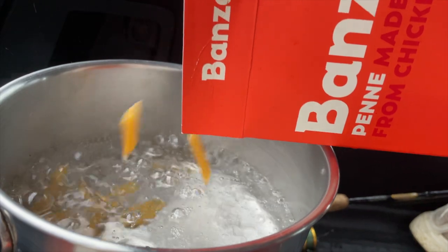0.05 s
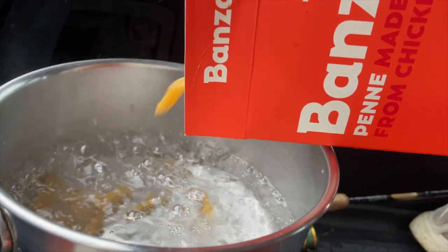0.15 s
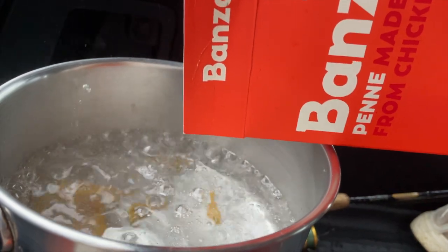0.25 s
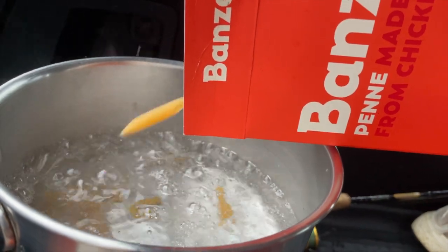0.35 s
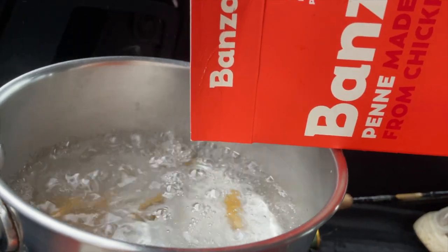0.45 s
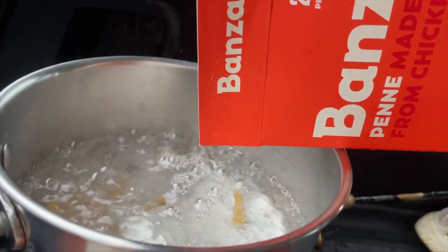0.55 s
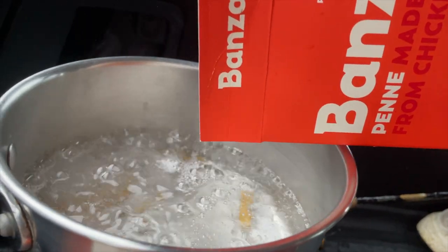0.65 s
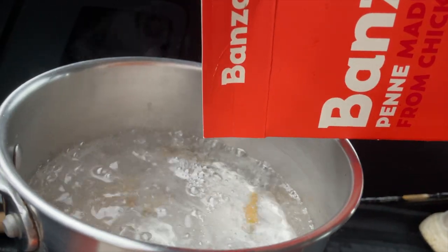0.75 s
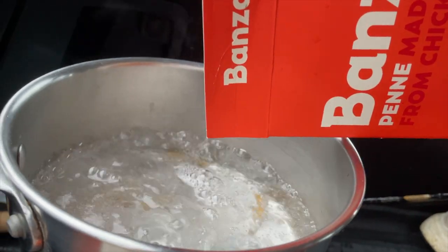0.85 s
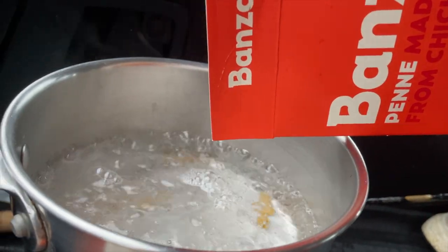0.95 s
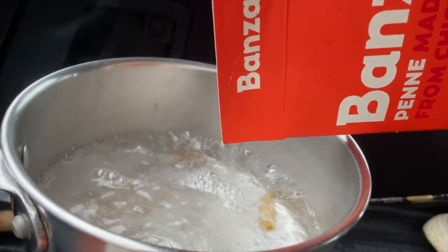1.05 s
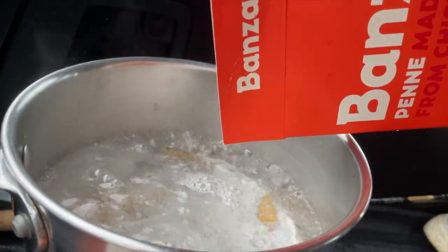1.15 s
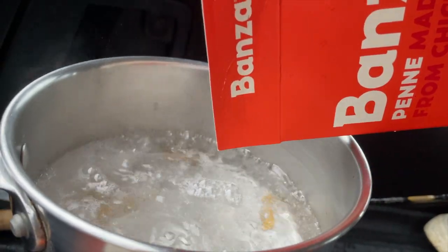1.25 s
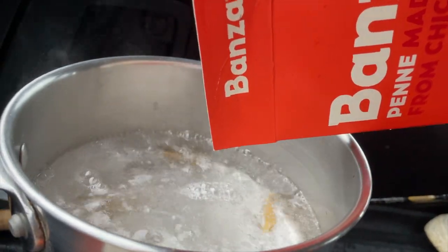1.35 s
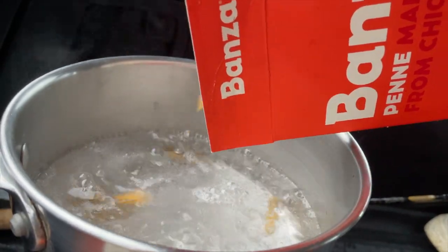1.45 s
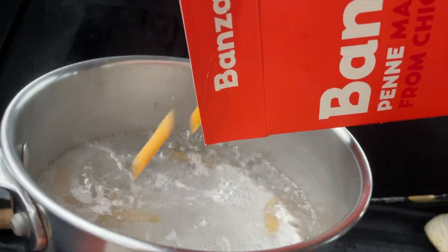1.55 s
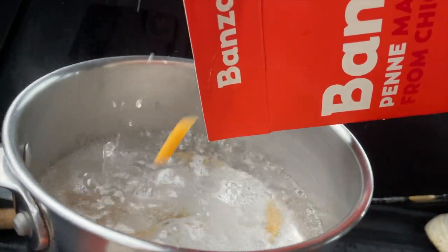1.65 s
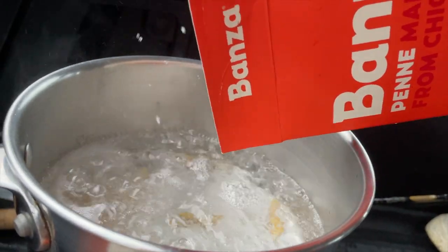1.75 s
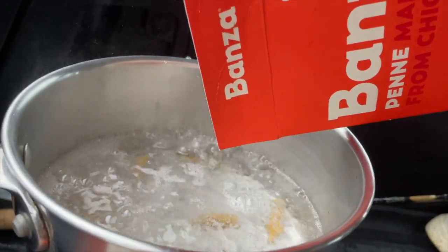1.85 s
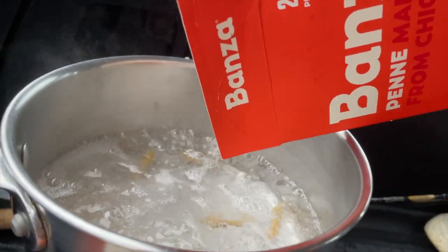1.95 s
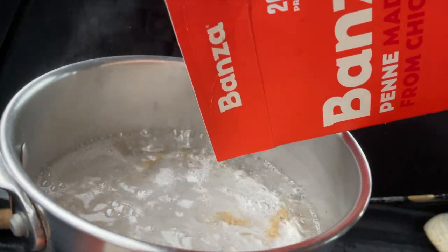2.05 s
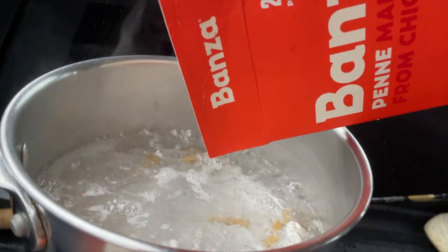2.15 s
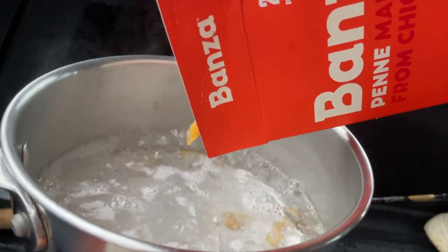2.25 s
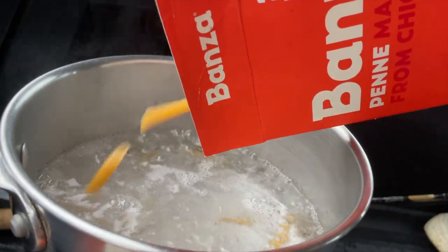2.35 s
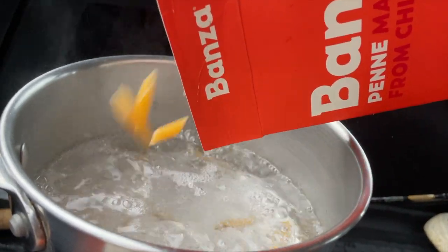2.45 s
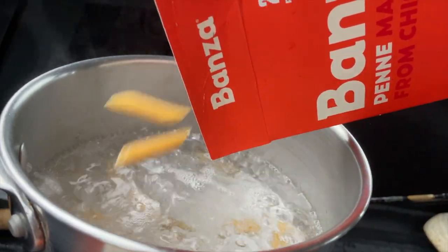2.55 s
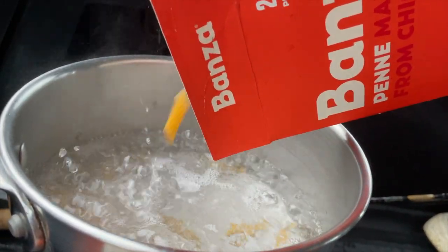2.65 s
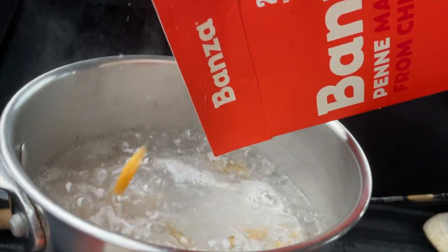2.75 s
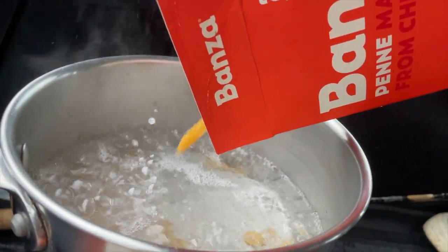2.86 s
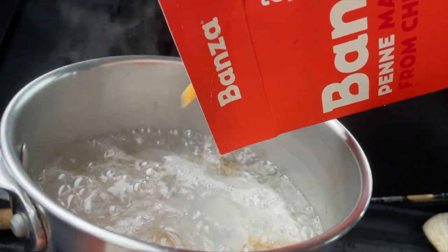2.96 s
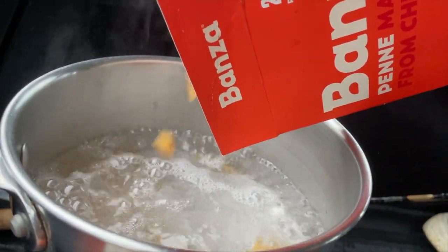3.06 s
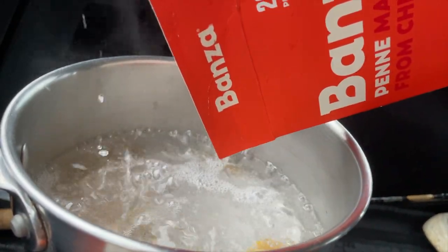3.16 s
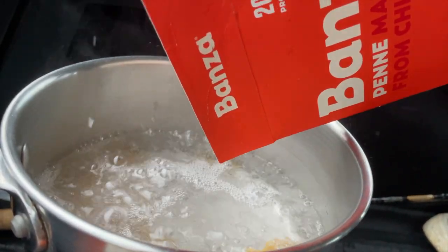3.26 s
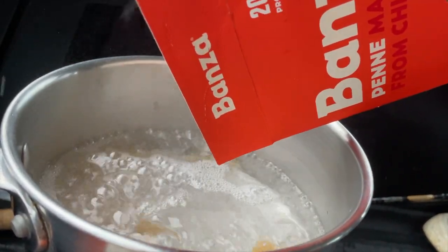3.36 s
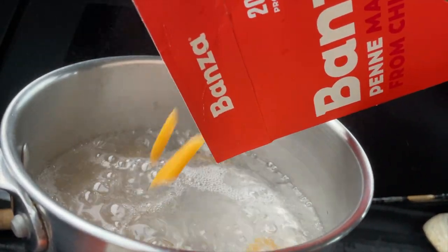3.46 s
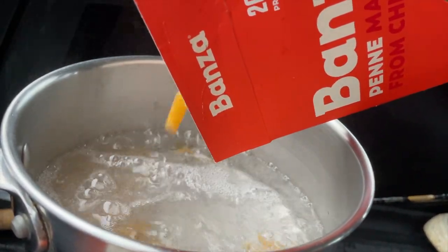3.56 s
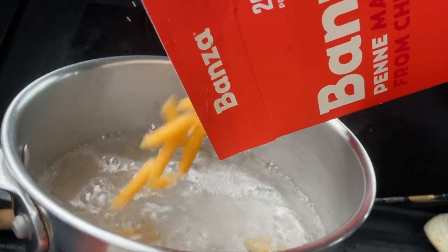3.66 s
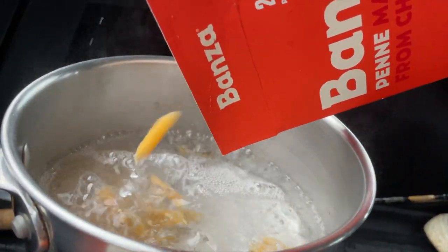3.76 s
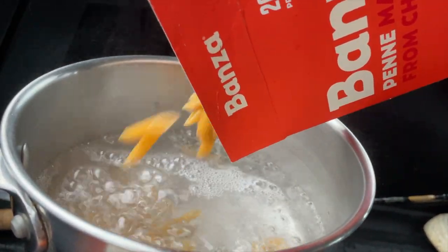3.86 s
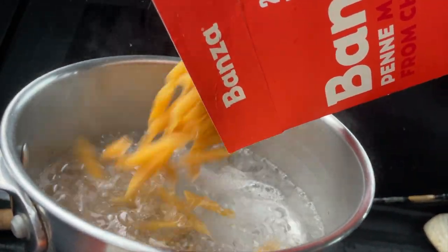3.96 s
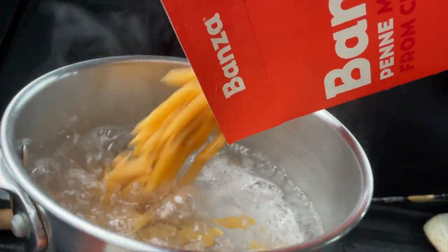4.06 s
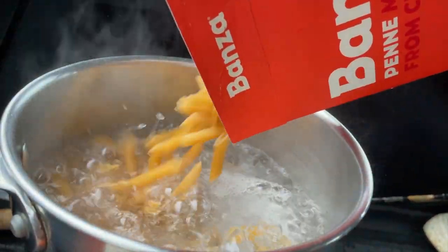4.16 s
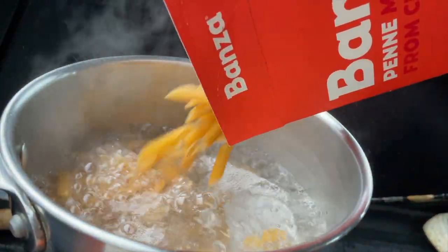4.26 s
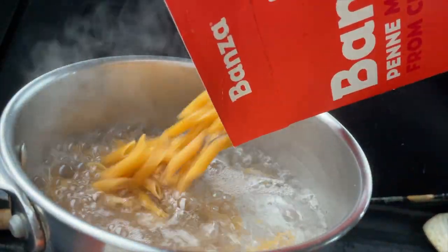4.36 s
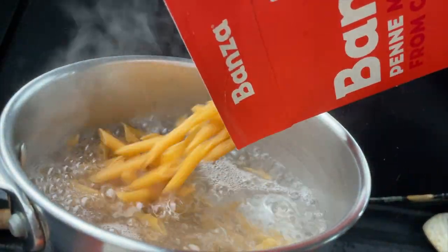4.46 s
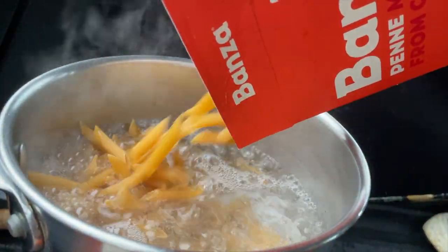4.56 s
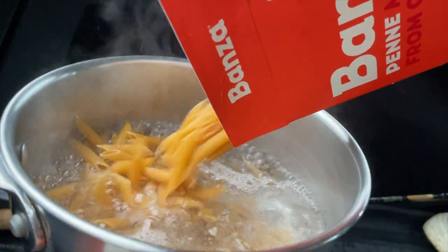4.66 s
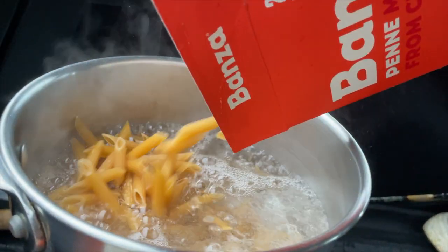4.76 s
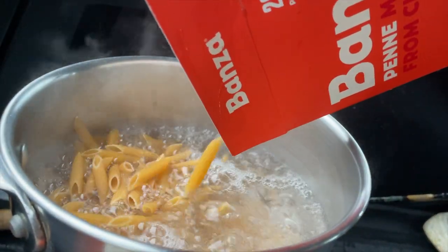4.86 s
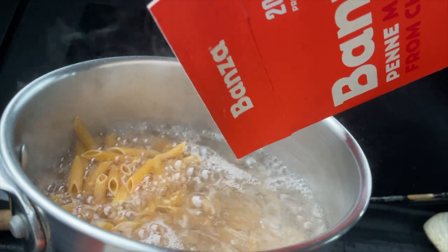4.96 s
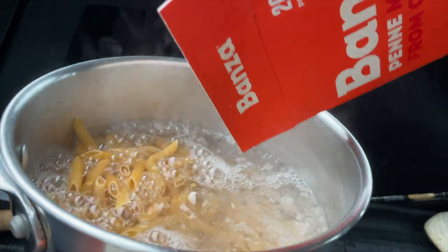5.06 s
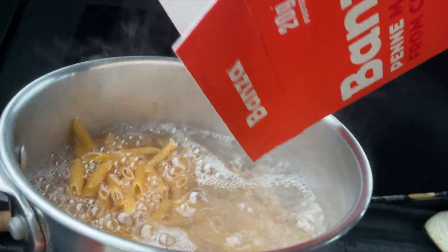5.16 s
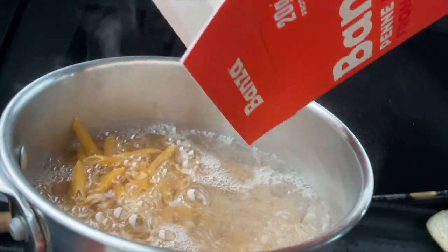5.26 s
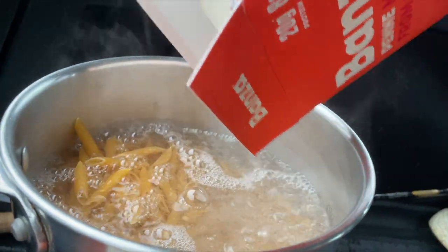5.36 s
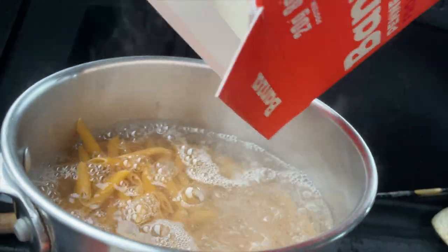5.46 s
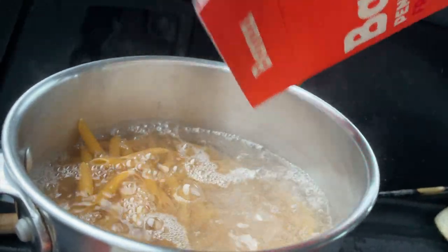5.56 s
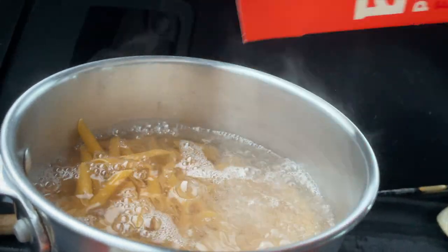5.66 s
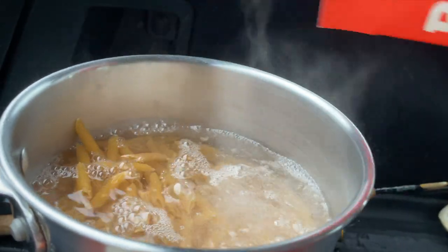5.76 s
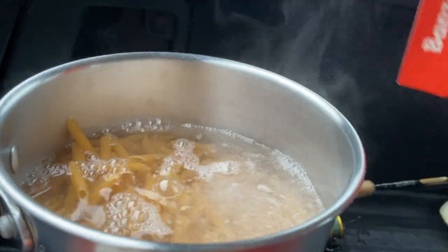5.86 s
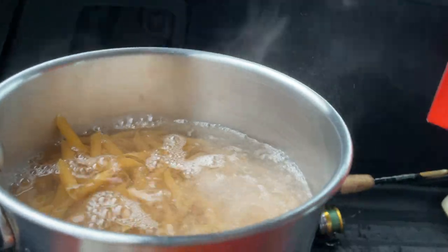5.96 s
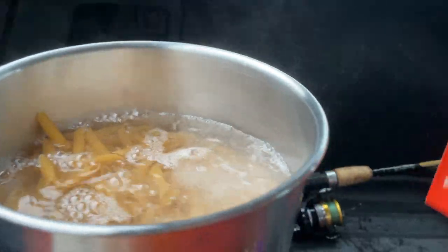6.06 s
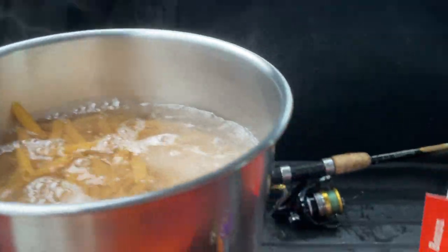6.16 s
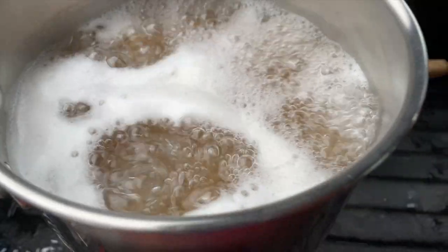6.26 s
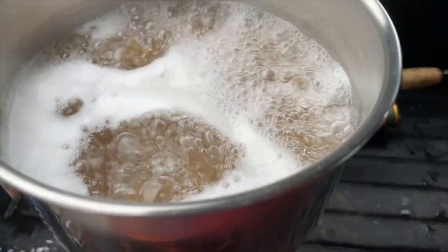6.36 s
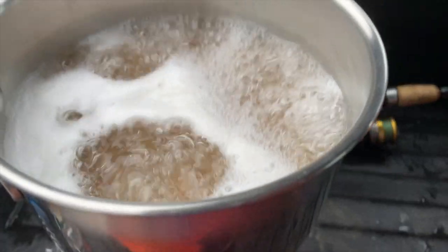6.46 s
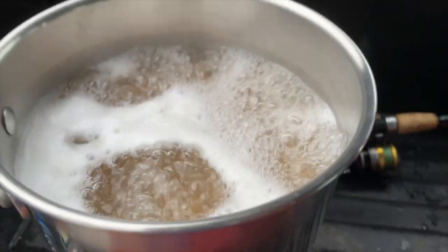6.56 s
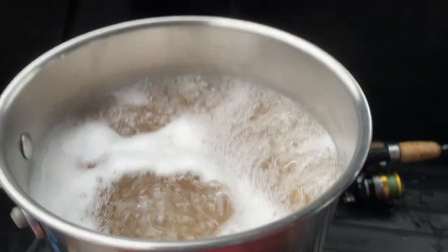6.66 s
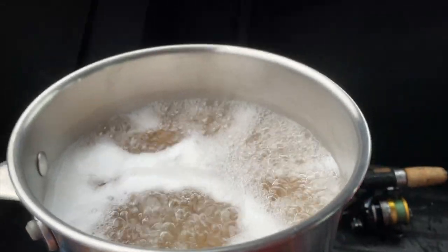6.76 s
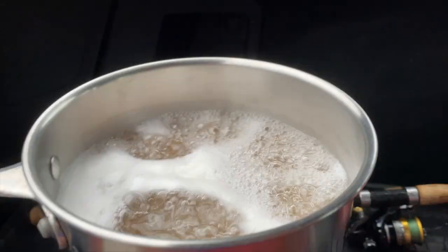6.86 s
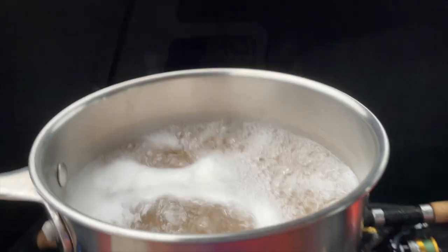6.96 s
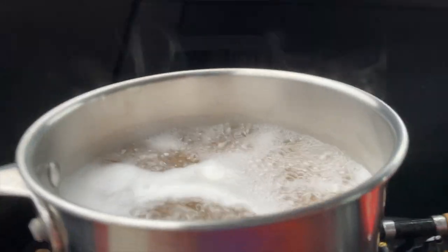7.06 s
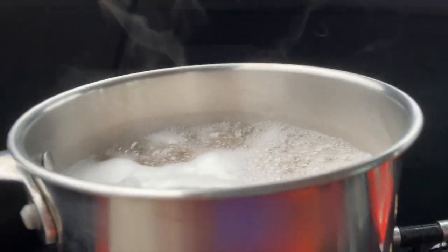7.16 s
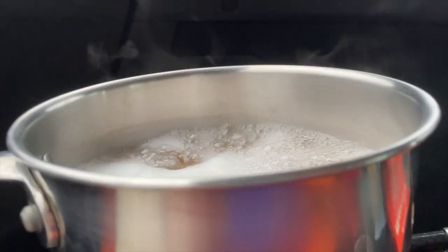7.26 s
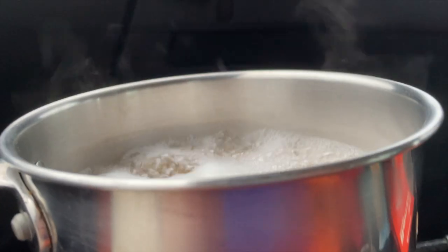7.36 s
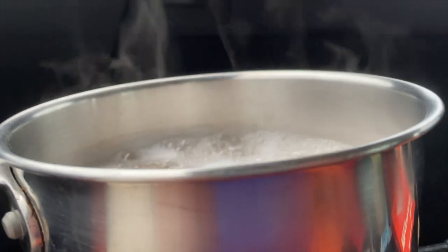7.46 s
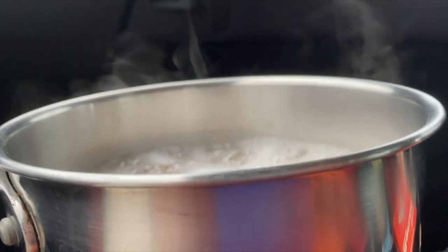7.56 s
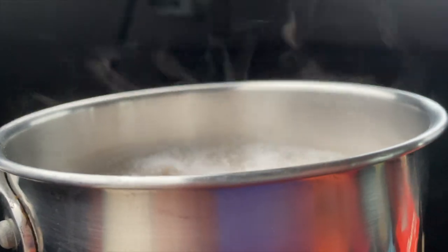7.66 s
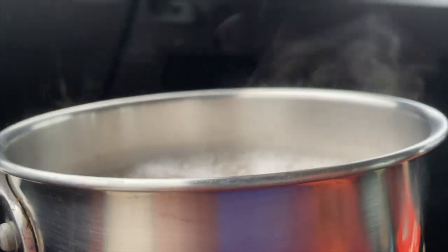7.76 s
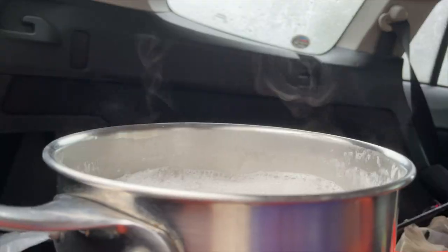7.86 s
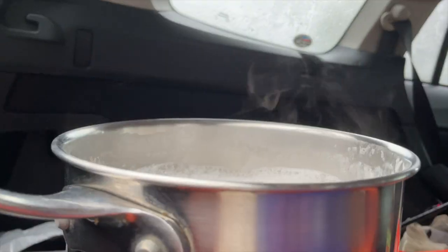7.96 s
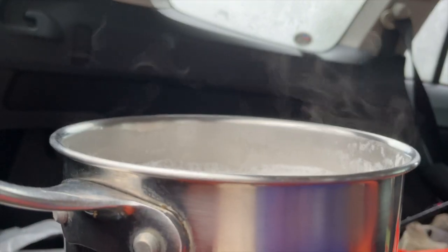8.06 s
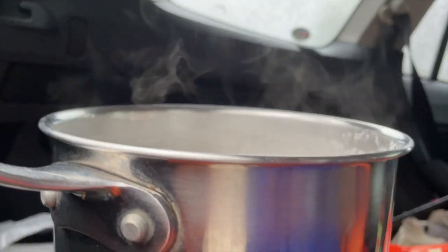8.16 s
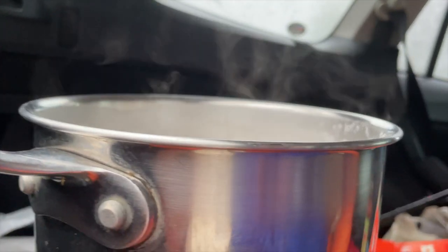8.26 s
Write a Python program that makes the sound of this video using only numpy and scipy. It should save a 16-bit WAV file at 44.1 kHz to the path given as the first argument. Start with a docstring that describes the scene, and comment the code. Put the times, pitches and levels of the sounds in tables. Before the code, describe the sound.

Hollow cardboard knocks and dry rasping come in uneven bursts over steady burner rumble, gas hiss and boiling bubbles. After about four seconds hard pasta tubes rush out, clicking and rattling as the water fizzes up. The pour stops quickly, leaving a calmer boil, then the box lands with a thump. An abrupt change brings the flame nearer, bubbling louder with a thin high whistle, before the gas drops. Close microphone, small dry cabin.

```python
"""In a small vehicle cabin a steel pot boils on a gas burner: filtered-noise rumble and hiss, ringing bubbles.
Dry penne shift in a cardboard box: grains rub and tick, single pieces knock panel modes, a few make the water fizz.
Then the load pours out; dense contacts ring many short tubes, and the fizz swells with the clatter.
Low booms follow, and the box lands with a thump: three quick blows on the modes of a surface.
The stove is then heard from nearer the flame, with a low drone and a stronger whistle, and at last with less gas."""
import sys
import numpy as np
from scipy import signal
from scipy.fft import rfft, irfft, next_fast_len
from scipy.io import wavfile
from scipy.ndimage import uniform_filter1d

SR = 44100
rng = np.random.default_rng(int(sys.argv[2]) if len(sys.argv) > 2 else 0)


def generate_wav(sig):
    """Save sig (samples, or channels by samples) to the path in sys.argv[1] as 16-bit PCM at SR."""
    pcm = np.round(np.clip(np.atleast_2d(sig).T, -1, 1) * 32767).astype(np.int16)
    wavfile.write(sys.argv[1], SR, pcm)


N = 366471
TIME = np.arange(N) / SR
CUTOFF_HZ = 15900


def amp(db):
    """Decibels to linear gain."""
    return 10 ** (np.asarray(db) / 20)


def rms_one(x):
    """Scale to an RMS of 1."""
    return x / np.sqrt(np.mean(x ** 2) + 1e-20)


def peak_one(x):
    """Scale to a peak of 1."""
    return x / (np.abs(x).max() + 1e-20)


def in_time(rows):
    """Each column of a breakpoint curve at every sample."""
    s, *columns = np.transpose(rows)
    return [np.interp(TIME, s, column) for column in columns]


def at_hz(points, hz):
    """A spectrum in dB, read on a log-frequency axis."""
    points = np.array(points)
    return np.interp(np.log(hz + 1), np.log(points[:, 0]), points[:, 1])


def add(track, s, sound):
    """Lay a short sound into a track, in place."""
    at = max(int(s * SR), 0)
    track[at:at + len(sound)] += sound[:N - at]


def drift(rate):
    """Smooth random movement of RMS 1, with the given number of random knots per second."""
    knots = rng.standard_normal(int(N / SR * rate) + 2)
    return rms_one(np.interp(TIME * rate, np.arange(len(knots)), knots))


def colour(x, spectrum, size=4096):
    """Causal (minimum-phase) filter with the given spectrum, built by folding its cepstrum."""
    cepstrum = irfft(np.log(amp(at_hz(spectrum, np.fft.rfftfreq(size, 1 / SR)))))
    cepstrum[1:size // 2] *= 2
    cepstrum[size // 2 + 1:] = 0
    impulse = irfft(np.exp(rfft(cepstrum)))
    return signal.oaconvolve(x, impulse)[:len(x)]


def ring(force, hz, t60):
    """One decaying mode: a unit click starts a cosine of height about 1."""
    radius = amp(-60 / (t60 * SR))
    angle = 2 * np.pi * hz / SR
    return signal.lfilter([.5, 0, -.5], [1, -2 * radius * np.cos(angle), radius * radius], force + 1e-18)


def grains(per_s, spread_db):
    """Random clicks of uneven size and sign; mean power 1 at any constant rate."""
    born = rng.random(N) < per_s / SR
    size_db = spread_db * np.minimum(rng.standard_exponential(N)[born], 4)
    sign = np.sign(rng.random(N)[born] - .5)
    out = np.zeros(N)
    out[born] = amp(size_db) * sign
    return rms_one(out / np.sqrt(per_s))


def burst(rise_s, decay_s, size=4096):
    """Noise that swells and dies, for the many tiny contacts of one touch; energy 1."""
    t = TIME[:size]
    envelope = np.minimum(t / rise_s, 1) * np.exp(-np.maximum(t - rise_s, 0) / decay_s)
    noise = rng.standard_normal(size) * envelope
    return noise / np.sqrt(np.sum(noise ** 2))


def scatter(x, decay_s):
    """Dense near reflections: smeared in time by random phases, nearly unchanged in colour."""
    paths = rfft(burst(.0003, decay_s))
    phases_only = irfft(paths / np.abs(paths))
    return signal.fftconvolve(x, phases_only[:len(paths)])[:N]


# the stove beside the pot, calmed by cold pasta, nearer the flame, then with less gas:
# start_s, flame_level_db, boil_level_db, hiss_level_db, whistle_level_db
STOVE = [(0, -39, -53.5, -46.5, -57.5), (4.9, -39, -55, -47.5, -60.5), (6.23, -35.5, -49.5, -50, -53),
         (7.87, -39.5, -49.5, -53, -68)]
STOVE_CHANGE_S = 0.018


def stove_levels():
    """Each setting of the stove holds until the next, with a short glide between."""
    rows = np.array(STOVE)
    setting = np.searchsorted(rows[1:, 0], TIME)
    return uniform_filter1d(rows[setting, 1:].T, int(STOVE_CHANGE_S * SR), axis=1)


# burner rumble heard beside the pot: frequency_hz, gain_db
RUMBLE = [(15, -34), (30, -27), (42, -4), (65, -1), (105, -3.5), (150, -2), (215, -4), (270, -15.5),
          (420, -27), (900, -38.5), (2000, -95)]
# burner rumble heard nearer the flame: frequency_hz, gain_db
RUMBLE_NEAR = [(15, -40), (30, -17), (50, 1), (90, 2.5), (125, -5), (165, -0.5), (220, -7), (290, -17),
               (420, -18), (900, -32), (2000, -101)]


def flame(near, drone_hz=88.35, drone_db=-4.0):
    """Turbulent combustion rumbles as shaped noise; close to the flame a low drone stands out of it."""
    white = rng.standard_normal(N)
    drone = amp(drone_db) * rms_one(ring(rng.standard_normal(N), drone_hz, 0.48))
    beside_pot = rms_one(colour(white, RUMBLE))
    near_flame = rms_one(rms_one(colour(white, RUMBLE_NEAR)) + drone)
    return (1 - near) * beside_pot + near * near_flame


# gas hiss heard beside the pot: frequency_hz, gain_db
HISS = [(400, 10.5), (1100, -3.5), (1400, 2.5), (2000, -1), (2600, 3), (3200, 6), (3700, -0.5), (4700, 0),
        (5500, -4.5), (6650, 7.5), (7600, -4.5), (9500, -6), (13000, 0), (16000, 2.5)]
# gas hiss heard nearer the flame: frequency_hz, gain_db
HISS_NEAR = [(400, -8), (1100, 5), (1500, -4), (2400, 3.5), (3650, 1.5), (4400, 1), (4750, -1), (5200, 0),
             (5600, -7), (6650, 7), (7650, -8.5), (8700, -4), (9700, -6.5), (16000, -7)]
# hiss of the jet turned down: frequency_hz, gain_db
HISS_LOW = [(400, -3), (1100, 12), (1500, 4.5), (2200, 7.5), (2850, 4), (3250, 11), (3750, -1), (4700, -3),
            (5200, 0.5), (5600, -6), (6000, 5), (6700, 4), (7600, -7), (8500, -6), (16000, -7)]
# nozzle whistle and the fainter tones below it, both levels applied near the flame:
# time_s, whistle_pitch_hz, whistle_swell_db, lower_pitch_hz, lower_level_db
WHISTLE = [(6.25, 6060, -4, 4360, -14), (6.52, 6240, 2.5, 4320, -6), (6.88, 6060, 0, 4500, -12),
           (7.02, 6070, -3, 4550, -11), (7.25, 6160, -0.5, 4450, -18), (7.7, 6090, 1, 4400, -22)]


def jet(near, hiss_db, whistle_db, whistle_width_hz=95, wander_hz=20, flutter_db=1.8):
    """Gas hisses through the nozzle with a breathy, wavering whistle; fainter tones join it near the flame."""
    whistle_hz, swell_db, lower_hz, lower_db = in_time(WHISTLE)
    white = rng.standard_normal(N)
    low = TIME > STOVE[-1][0]
    hiss = 0
    for share, spectrum in [(1 - near, HISS), (near - low, HISS_NEAR), (low, HISS_LOW)]:
        hiss = hiss + share * rms_one(colour(white, spectrum))
    lower = near * amp(lower_db)
    tones = [(whistle_hz, amp(near * swell_db)), (lower_hz, lower), (1.17 * lower_hz, 0.53 * lower)]
    breath_filter = signal.butter(2, whistle_width_hz, fs=SR, output="sos")
    whistle = 0
    for hz, strength in tones:
        # slow noise on both quadratures makes a narrow band of noise around the moving pitch
        waver = signal.sosfilt(breath_filter, rng.standard_normal((2, N)))
        phase = 2 * np.pi * np.cumsum(hz + wander_hz * drift(12)) / SR
        whistle = whistle + strength * rms_one(waver[0] * np.cos(phase) + waver[1] * np.sin(phase))
    return amp(hiss_db) * hiss + amp(whistle_db + flutter_db * drift(16)) * whistle


# colour of the boil across its bubble pitches: frequency_hz, gain_db
BUBBLES = [(200, 18), (330, -4), (480, 3.5), (760, 5.5), (950, -36), (1200, -3.5), (1500, -36), (2400, -7)]


def boil(count=18, cycles=15, per_s=380, gulp_db=1.6):
    """Big steam bubbles collapse in gulps, each ringing briefly at its own pitch."""
    collapses = grains(per_s, spread_db=0.0) * amp(gulp_db * drift(35))
    dealt = rng.integers(0, count, N)  # which pitch each collapse excites
    bubbles = np.zeros(N)
    for k, hz in enumerate(np.geomspace(260, 1900, count)):
        bubbles += amp(at_hz(BUBBLES, hz)) * hz * ring(collapses * (dealt == k), hz, cycles / hz)
    return rms_one(bubbles)


BLIPS_PER_S, BLIP_HZ = 62, 620  # rate and middle pitch


def blips(spread_octaves=.4, spread_db=4.0, rise_per_s=5.3, count=800):
    """Single bubbles pop at the surface, ringing for only a few cycles and rising slightly in pitch."""
    out, t = np.zeros(N), TIME[:1024]
    times = (np.arange(count) + 6 * rng.random(count)) / BLIPS_PER_S
    chances = np.clip(rng.standard_normal((count, 3)), -2, 2)
    for s, (size, strength, length) in zip(times, chances):
        if s < TIME[-1]:
            hz = BLIP_HZ * 2 ** (spread_octaves * size)
            age = t * hz / (.6 * 1.5 ** length)
            tone = np.sin(2 * np.pi * hz * t * (1 + rise_per_s * t))
            add(out, s, amp(spread_db * strength) * age * np.exp(-age) * tone)
    return rms_one(out)


# colour of the fizzing water, also used for the edge of a click: frequency_hz, gain_db
FIZZ = [(1500, -6), (3200, 1), (5500, -5.5), (6500, 3), (7600, -8.5), (9400, -6.5), (11000, 0.5),
        (13100, 5), (14300, -2.5), (16000, -6.5)]


def fizz(flicker_db=2.5):
    """Tiny bubbles burst in flurries where the pasta meets the water."""
    return rms_one(colour(grains(6000, spread_db=3.5), FIZZ)) * amp(flicker_db * drift(24))


JAM_DB_PER_S = 304


def fade_outside(start, stop):
    """Loss in dB before the load breaks loose and after it jams."""
    outside_s = np.maximum(start - TIME, TIME - stop)
    return JAM_DB_PER_S * np.clip(outside_s, 0, 1)


# tips of the box; the last row stops before its start and stays practically silent:
# start_s, crest_s, stop_s, crest_sliding_db
TIPS = [(-.1, 0, 0.37, -40), (0.644, 1.004, 1.1, -47.5), (1.152, 1.316, 1.7, -42.5),
        (1.903, 2.273, 3.0, -39), (5.05, 5.11, 4.4, -44)]
SWELL_DB = 7


def shifting():
    """Level in dB of the load, which swells to the crest of a tip and ebbs; the loudest tip wins."""
    levels = []
    for start, crest, stop, db in TIPS:
        below_crest_db = SWELL_DB * np.interp(TIME, [start, crest, stop], [1, 0, 1])
        levels.append(db - below_crest_db - fade_outside(start, stop))
    return np.max(levels, axis=0)


# cardboard panels and the air in the box, undamped: mode_hz, level_db, t60_s
BOX = [(520, -2.5, 0.065), (668, 5.5, 0.044), (810, 1, 0.056), (1104, 6, 0.016), (1479, 0, 0.04),
       (1730, -4.5, 0.025), (2210, -0.5, 0.026)]
# colour of pasta rubbing along cardboard: frequency_hz, gain_db
RASP = [(150, -20), (290, -13.5), (410, -11), (600, -0.5), (950, -6), (1150, -1.5), (1350, -7),
        (1600, -4.5), (2000, -10.5), (2700, -13.5), (4500, -20), (9000, -39)]


def sliding(per_s, weight, rasp_db=-2.0, drum_follows=0.18):
    """The load rasps along the cardboard in uneven clumps; the harder it slides, the more the panels drum."""
    drum = rms_one(sum(amp(db) * ring(grains(per_s / 2, spread_db=1.0), hz, t60) for hz, db, t60 in BOX))
    rasp = rms_one(colour(grains(2 * per_s, spread_db=1.0), RASP))
    clumps = amp(1.8 * drift(70) - 2)
    return (weight ** drum_follows * drum + amp(rasp_db) * rasp) * clumps


# sharp clicks of hard pieces meeting: start_s, level_db, pitch_hz
CLICKS = [(.0105, -20, 3120), (0.024, -24.5, 5280), (0.133, -19.5, 2380), (0.2963, -22, 2210),
          (1.506, -29.5, 5930), (1.58, -27, 3580), (1.726, -27.5, 2230), (2.2619, -23, 3300),
          (2.409, -25, 3760), (2.487, -26, 5030), (2.654, -23.5, 3680), (2.951, -25, 6430),
          (4.119, -11.5, 4920), (4.2195, -13, 4980), (4.419, -11, 3360), (4.5073, -23, 3630),
          (4.541, -11.5, 6040), (4.695, -20, 2850), (4.7193, -12, 3340), (4.729, -13, 6540),
          (4.7881, -11, 3620), (4.945, -31.5, 6240), (5.077, -30.5, 2770)]
# a dry tube of pasta: multiple_of_pitch, level_db, t60_s
TUBE = [(1.002, 10, 0.024), (1.9, -6, 0.052), (3.4, -18, 0.011)]


def clicks(contacts, tube_db=-2.5, edge_db=2.0):
    """Hard contacts stand out of the clatter: a sharp edge, and a tube ringing briefly at its own pitch."""
    out = np.zeros(N)
    for s, level_db, pitch_hz in contacts:
        touch = burst(.0002, .002)
        modes = [(k * pitch_hz, db, t60) for k, db, t60 in TUBE if k * pitch_hz < CUTOFF_HZ]
        tube = sum(amp(db) * ring(touch, hz, t60) for hz, db, t60 in modes)
        tick = peak_one(colour(burst(0.0014, 0.014), CLATTER))
        edge = amp(edge_db) * peak_one(colour(burst(0.0001, 0.0074), FIZZ))
        add(out, s, amp(level_db) * peak_one(tick + edge + amp(tube_db) * peak_one(tube)))
    return out


# colour of piece striking piece: frequency_hz, gain_db
CLATTER = [(400, -17), (1500, -20.5), (2400, 7), (2900, 1.5), (3350, 7), (4200, 3), (4950, -0.5),
           (5650, -10.5), (6500, 9), (6950, 0.5), (7500, 3.5), (9300, -5), (13000, 5.5), (16000, -14)]


def clatter(per_s, count=40, low_hz=1100, high_hz=7200, tube_t60=0.023, tick_db=3.5):
    """Hard pieces tick against each other in clumps; each tick sets one tube ringing briefly at its own pitch."""
    ticks = grains(1.25 * per_s * amp(2.0 * drift(60)), spread_db=2.5)
    dealt = rng.integers(0, count, N)  # which tube each tick excites
    pitches = np.linspace(low_hz, high_hz, count)
    tubes = sum(ring(ticks * (dealt == k), hz, tube_t60) for k, hz in enumerate(pitches))
    bare_ticks = rms_one(ticks + scatter(ticks, 0.0028))
    return rms_one(colour(rms_one(tubes) + amp(tick_db) * bare_ticks, CLATTER))


# the hardest knocks on the box wall: start_s, level_db, leading_pitch_hz, treble_db
KNOCKS = [(.058, -22.5, 750, 0), (.083, -22, 710, -15), (.1, -28, 755, -28), (.137, -14.5, 646, -7),
          (.222, -10, 665, -14.5), (.283, -22.5, 760, -18), (.311, -21.5, 725, -5), (.326, -26, 920, -4),
          (.471, -27.5, 800, -43), (.5395, -23.5, 1300, -10.5), (.9755, -20.5, 855, -9.5),
          (.988, -28, 700, -16), (1.177, -24, 900, -12), (1.333, -18.5, 620, -13.5),
          (1.363, -19.5, 750, -11), (1.412, -20, 660, -10), (1.532, -21.5, 663, -22),
          (1.555, -22, 668, -17), (2.081, -23, 810, -10), (2.091, -24, 1310, -10), (2.122, -22, 1180, -12),
          (2.173, -19, 760, -14.5), (2.2425, -19, 680, -20), (2.263, -21, 660, -3.5),
          (2.304, -16, 1040, -10.5), (2.313, -17, 766, -12), (2.332, -20.5, 697, -9), (2.374, -19, 690, -6),
          (2.388, -20, 697, -13), (2.426, -21, 570, -11), (2.45, -26, 606, -7), (2.462, -22, 680, -8),
          (2.538, -20.5, 615, -15), (2.574, -22, 668, -9.5), (2.613, -24.5, 1010, -5),
          (2.661, -21, 620, -6), (2.809, -11.5, 660, -27), (2.89, -25.5, 900, -10), (2.98, -25, 704, -23),
          (3.081, -34, 740, -16), (3.19, -29.5, 690, -25), (3.411, -29, 1090, -1), (3.519, -26, 676, -5),
          (3.547, -16.5, 524, -12), (3.731, -16.5, 700, -14), (3.795, -15, 650, -18.5),
          (3.81, -16.5, 720, -18), (3.968, -19, 824, -16), (4.093, -15, 780, -10), (4.243, -16, 810, -6),
          (4.336, -20, 832, -5), (4.439, -11.5, 816, -8), (5.957, -26, 1440, -12.5)]
# snap of a hard edge on cardboard: frequency_hz, gain_db
SNAP = [(400, -12), (1300, -2), (2400, 3), (3600, -2), (4900, -3), (5600, -12.5), (6600, -1), (8000, -21),
        (13000, -7), (16000, -28)]
# hollow bass under a knock; more of it during the long tip
HOLLOW_DB, LONG_TIP_HOLLOW_DB = -16.5, -9
# share of the panels' ring time that is left while a piece presses on them
PANEL_DAMPING = .65


def knocks(hits, lead_db=9.5, lead_t60=0.024, scuff=1.44, bounce_s=0.00346, bounce_db=-2.5,
           crack_db=3.5, hollow_hz=300, skid_db=-18.0, detune=0.052):
    """A piece skids, snaps on the wall and strikes again; the spot sets the pitch, the load damps the panels."""
    out = np.zeros(N)
    long_start, _, long_stop, _ = max(TIPS, key=lambda tip: tip[2] - tip[0])
    for s, level_db, lead_hz, treble_db in hits:
        force = scuff * burst(.0015, .002)
        force[int(.0015 * SR)] += .7
        second_strike = amp(bounce_db) * burst(.0005, .001, size=1024)
        add(force, bounce_s * (.5 + rng.random()), second_strike)

        body = amp(lead_db) * ring(force, lead_hz, lead_t60)
        for hz, db, t60 in BOX:
            detuned_hz = hz * (1 + detune * rng.standard_normal())
            body = body + amp(db) * ring(force, detuned_hz, PANEL_DAMPING * t60)
        soft_hz = min(2600 * amp(treble_db / 5), SR / 4)  # a soft contact is duller
        body = signal.sosfilt(signal.butter(2, soft_hz, fs=SR, output="sos"), body)

        bass_db = LONG_TIP_HOLLOW_DB if long_start < s < long_stop else HOLLOW_DB
        hollow = amp(bass_db) * peak_one(ring(ring(force, hollow_hz, 0.013), hollow_hz, 0.013))
        snap = colour(burst(.0005, .004) + .5 * burst(.002, .012), SNAP)
        crack = amp(treble_db + crack_db) * peak_one(snap)
        skid = peak_one(colour(burst(.012, .012), RASP))
        add(out, s, amp(level_db) * (peak_one(body) + hollow))
        add(out, s + .001, amp(level_db) * crack)
        add(out, s - .012, amp(level_db + skid_db) * skid)
    return out


# lesser knocks while the load moves: rate, middle leading pitch, middle treble
STRAY_PER_S, STRAY_HZ, STRAY_TREBLE_DB = 14, 760, -6.5
# their middle level at the height of the pour, and the share of the sliding's swing that they follow
STRAY_DB, STRAY_FOLLOWS = -20.5, 0.92


def stray_knocks(slide, spread_db=0.3, spread_octaves=0.52, treble_spread_db=5, count=120):
    """Rows of lesser knocks, unevenly spaced, stronger the harder the load slides."""
    s = (np.arange(count) + rng.random(count)) / STRAY_PER_S
    strength, spot, hardness = rng.standard_normal((count, 3)).T
    below_crest_db = 20 * np.log10(np.interp(s, TIME, peak_one(slide)))
    level_db = STRAY_DB + STRAY_FOLLOWS * below_crest_db + spread_db * strength
    pitch_hz = STRAY_HZ * 2 ** (spread_octaves * spot)
    treble_db = STRAY_TREBLE_DB + treble_spread_db * hardness
    rows = np.transpose([s, level_db, pitch_hz, treble_db])
    return list(rows[s < POUR[-1][0]])


# a few pieces land in the water and it fizzes up: start_s, level_db
SPLASHES = [(.09, -40.5), (.44, -47), (1.33, -48), (1.58, -45.5), (1.69, -58), (2.25, -54), (2.63, -43),
            (2.83, -48), (3.19, -43), (3.53, -47), (5.09, -42)]
SPLASH_RISE_S, SPLASH_FALL_DB_PER_S = 0.0051, 56


def splashes():
    """Strength of the fizz that flares and settles where pieces land."""
    out, t = np.zeros(N), TIME[:SR]
    fall = amp(-SPLASH_FALL_DB_PER_S * np.maximum(t - SPLASH_RISE_S, 0))
    flare = np.minimum(t / SPLASH_RISE_S, 1) * fall
    for s, level_db in SPLASHES:
        add(out, s, amp(level_db) * flare)
    return out


# the steel pot and the air in it: mode_hz, level_db, t60_s
POT = [(761, 5, 0.035), (1170, 0.5, 0.034), (1505, -5.5, 0.12), (2150, -13, 0.12), (2840, 0.5, 0.15),
       (3165, 5.5, 0.05), (3340, -2, 0.16), (3840, 2, 0.11), (4700, -10, 0.1), (7070, 8, 0.084),
       (13440, -9, .09)]


def pot(x, ring_db=-48.5):
    """What happens at its mouth sets the pot ringing faintly."""
    return x + amp(ring_db) * sum(amp(db) * ring(x, hz, t60) for hz, db, t60 in POT)


# pieces scrape along the wall as the box tilts: start_s, stop_s, level_db, pitch_hz
SCRAPES = [(1.28, 1.457, -44.5, 1150), (1.864, 2.248, -46, 1250)]


def scrapes(per_s=1400, t60=0.0083, rise_s=0.028):
    """A piece sticks and slips along the cardboard, sounding two broad resonances in uneven tugs."""
    slips = grains(per_s, spread_db=1.5) * amp(2.5 * drift(45))
    out = np.zeros(N)
    for start, stop, level_db, hz in SCRAPES:
        stroke = np.clip(np.minimum(TIME - start, stop - TIME) / rise_s, 0, 1)
        resonances = ring(slips, hz, t60) - .5 * ring(slips, 1.6 * hz, t60)
        out += amp(level_db) * stroke * rms_one(resonances)
    return out


# the whole load runs out: time_s, sliding_on_cardboard_db, piece_on_piece_clatter_db
POUR = [(3.1, -62, -57), (3.429, -39, -58), (3.719, -33, -45.5), (3.86, -28.5, -41), (4.1, -26, -29.5),
        (4.29, -28, -34.5), (4.37, -25, -28.5), (4.58, -30.5, -31.5), (4.73, -34, -31.5),
        (4.78, -40, -36.5), (4.88, -47, -42), (5.05, -58, -69)]
# the shifted pieces tumble against each other a moment later, more quietly
TUMBLE_LAG_S, TUMBLE_DB = 0.04, -8
# fizz of the plain boil, and fizz under the pour relative to its clatter
SIMMER_DB, POUR_FIZZ_DB = -55, -3


def motion():
    """Strength of sliding, clatter and fizz, as the tips and the pour drive them."""
    shift = amp(shifting())
    slide, tumble = amp(np.array(in_time(POUR)) - fade_outside(POUR[0][0], POUR[-1][0]))
    late_shift = np.interp(TIME - TUMBLE_LAG_S, TIME, shift)
    pour_fizz = amp(POUR_FIZZ_DB) * tumble
    froth = np.sqrt(amp(SIMMER_DB) ** 2 + splashes() ** 2 + pour_fizz ** 2)
    return np.hypot(shift, slide), np.hypot(amp(TUMBLE_DB) * late_shift, tumble), froth


# lesser clicks in the pour: rate, middle pitch, middle level at its height
STRAY_CLICKS_PER_S, STRAY_CLICK_HZ, STRAY_CLICK_DB = 45, 3394, -17.5


def stray_clicks(tumble, count=90):
    """Rows of lesser clicks during the pour, stronger the more the pieces tumble."""
    s = POUR[1][0] + (np.arange(count) + 2 * rng.random(count)) / STRAY_CLICKS_PER_S
    strength, length = rng.uniform(-1, 1, (count, 2)).T
    below_crest_db = 20 * np.log10(np.interp(s, TIME, peak_one(tumble)))
    level_db = STRAY_CLICK_DB + below_crest_db + 5 * strength
    rows = np.transpose([s, level_db, STRAY_CLICK_HZ * 2 ** (.8 * length)])
    return list(rows[s < POUR[-3][0]])


# low booms of the surface as the box is moved and set down: start_s, level_db, pitch_hz
BOOMS = [(5.246, -27.5, 54.4), (5.398, -29, 56.4), (6.087, -24.5, 70), (6.166, -13, 69.8)]


def booms(t60=0.18):
    """Each push sets the surface swinging for a few cycles."""
    out, t = np.zeros(N), TIME[:SR // 2]
    for s, level_db, hz in BOOMS:
        add(out, s, amp(level_db - 60 * t / t60) * np.cos(2 * np.pi * hz * t))
    return signal.sosfilt(signal.butter(2, [42, 220], "band", fs=SR, output="sos"), out)


# the box lands on an edge, a corner, then flat: start_s, level_db
LANDING = [(6.1475, -6), (6.15165, -3), (6.15475, 0)]
# the surface that the box is put down on: mode_hz, level_db, t60_s
SHELF = [(225, -14, .09), (385, 3, .075), (500, -1, .06), (678, -2, .07), (965, 9.5, .062),
         (1320, -1, .065), (1524, -8, .08), (1750, -3, .058), (2110, -5, .07), (2680, -7, .06),
         (3200, -3, .068)]
# slap of cardboard on it: frequency_hz, gain_db
SLAP = [(30, -27), (100, 6), (330, 9), (1000, 4), (1500, -7), (2800, -3), (4000, -10.5), (5500, -8),
        (8000, -13.5), (12000, -19), (16000, -25)]
SHELF_DB = -37.5  # level of the surface's ring


def thump(slap_db=-37.5, brush_db=-20.0, tail_db=-47.0, tail_s=0.017, settle_db=-16.5, settle_hz=200):
    """The box brushes the surface and lands in quick steps that ring it; its weight settles with a dull thud."""
    scuff, weight, tail, settle = np.zeros((4, N))
    first_s, last_s = LANDING[0][0], LANDING[-1][0]
    add(scuff, first_s - .014, amp(brush_db) * burst(.008, .008))
    for s, level_db in LANDING:
        add(scuff, s, amp(level_db) * burst(.0005, .0065))
        add(weight, s, amp(level_db) * 2 * np.ones(1))
    add(settle, last_s + .005, np.hanning(90))
    add(tail, last_s, burst(0.011, tail_s))
    body = np.zeros(N)
    for k, (hz, db, t60) in enumerate(SHELF):
        body += amp(db) * (-1) ** k * ring(scuff / 2 + weight, hz, t60)  # neighbouring modes oppose
    slap = amp(slap_db) * rms_one(colour(scuff, SLAP))
    dull = signal.sosfilt(signal.butter(1, 3000, fs=SR, output="sos"), colour(tail, SLAP))
    thud = amp(settle_db) * peak_one(ring(settle, settle_hz, 0.041))
    return amp(SHELF_DB) * rms_one(body) + slap + amp(tail_db) * rms_one(dull) + thud


# base rate of contacts while pieces move, scaled for each layer: time_s, contacts_per_s
FLOW = [(0, 500), (3.3, 700), (3.9, 900), (4.5, 700), (4.9, 400)]
BLIP_DB = -3.5  # single bubbles within the boil


def sources(hits, contacts, slide, tumble, froth):
    """One random draw of every layer but the thump, mixed to a single channel."""
    per_s, = in_time(FLOW)
    flame_db, boil_db, hiss_db, whistle_db = stove_levels()
    near, = in_time([(6.2, 0), (6.25, 1)])  # 0 beside the pot, 1 nearer the flame
    loose = slide * sliding(per_s, peak_one(slide)) + tumble * clatter(per_s) + scrapes()
    pasta = pot(loose + amp(-1.0) * knocks(hits) + amp(-1.5) * clicks(contacts))
    bubbling = amp(boil_db) * (amp(-2.5) * boil() + amp(BLIP_DB) * blips())
    water = (1 - near) * froth * fizz() + bubbling
    burner = amp(flame_db) * flame(near) + jet(near, hiss_db, whistle_db)
    return pasta + booms() + water + burner


# stereo width, as a filter on the side signal: frequency_hz, gain_db
WIDTH = [(40, -11.5), (90, -30), (180, -8), (350, -6.5), (800, -2), (1150, -2.5), (1600, 3), (3800, -3.5),
         (5400, 4.5), (6550, -6.5), (7700, 4.5), (9300, 8), (11300, -0.5), (13500, -21.5)]
# left-right balance, split evenly between the sides: frequency_hz, left_minus_right_db
LEAN = [(50, 0.5), (170, 4.5), (330, 6), (700, 8.5), (1300, 3.5), (5000, 3), (9000, -1.5), (13000, 1)]


def cabin(mid, other):
    """The direct sound leads on the left; a second, independently drawn layer spreads between the sides."""
    direct = (np.roll(mid, -11) - np.roll(mid, 11)) * .55  # a quarter millisecond early minus late
    spread = -np.imag(signal.hilbert(other, next_fast_len(N)))[:N] * .75  # turned by a quarter cycle
    side = colour(direct + spread, WIDTH)
    left_lean = [(hz, db / 2) for hz, db in LEAN]
    right_lean = [(hz, -db / 2) for hz, db in LEAN]
    return np.array([colour(mid + side, left_lean), colour(mid - side, right_lean)])


def scene():
    """The stove and the pour in the small cabin; the box is put down a little to the right."""
    slide, tumble, froth = motion()
    hits = KNOCKS + stray_knocks(slide)
    contacts = CLICKS + stray_clicks(tumble)
    put_down = np.array([np.roll(thump(), 5), thump()])  # left arrives 5 samples late
    mid = sources(hits, contacts, slide, tumble, froth)
    other = sources(hits, contacts, slide, tumble, froth)  # same events, fresh chance
    return put_down + cabin(mid, other)


def record(dry):
    """Peaks are rounded by soft saturation and a steep low-pass cuts the top."""
    rounded = 1.05 * np.tanh(dry / 1.05)
    return signal.sosfilt(signal.ellip(12, .1, 80, CUTOFF_HZ, fs=SR, output="sos"), rounded)


dry = scene()
out = record(dry)
generate_wav(out)
```